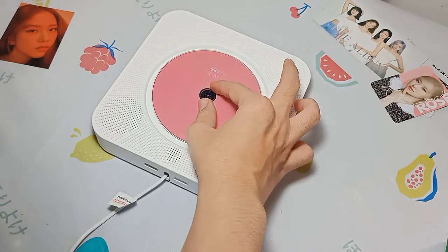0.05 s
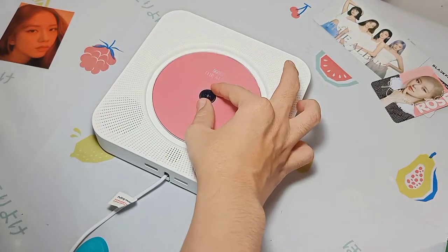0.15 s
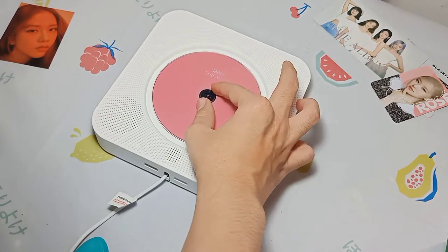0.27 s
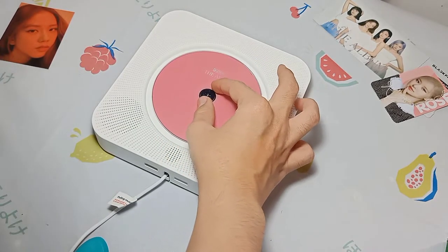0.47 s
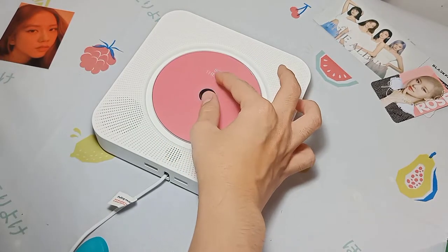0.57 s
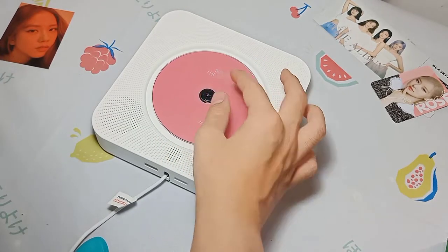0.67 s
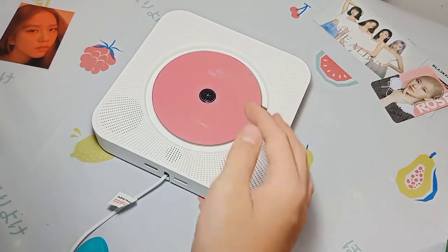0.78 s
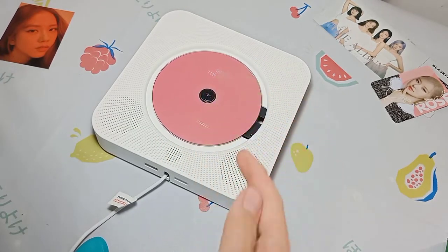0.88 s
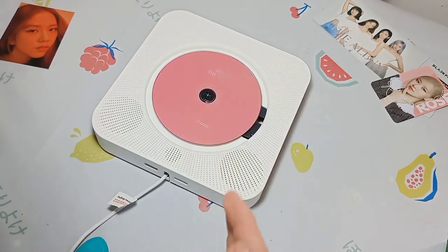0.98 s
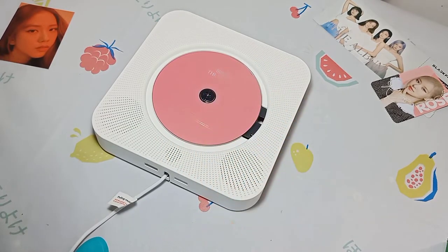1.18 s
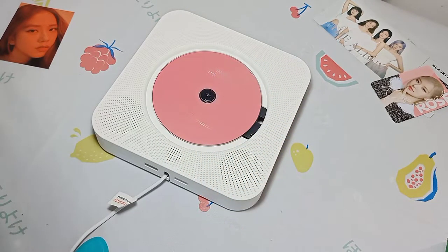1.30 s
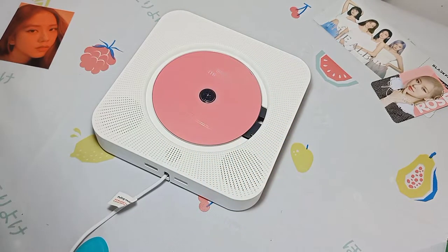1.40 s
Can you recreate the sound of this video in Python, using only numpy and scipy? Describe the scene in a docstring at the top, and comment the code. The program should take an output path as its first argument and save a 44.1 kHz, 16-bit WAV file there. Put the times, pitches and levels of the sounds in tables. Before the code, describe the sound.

Fingers tap faintly on plastic, then a disc snaps onto a player's hub with one bright, close click and a soft knock through the case. Barely audible hand brushes follow over quiet indoor noise and fan hum.

```python
"""A disc pressed onto a player's hub

The catches of a small plastic player slip and snap through the disc's hole, exciting bright modes.
The disc seats and rings briefly, the case and table thump, and a small room reverberates.
Fingers touch the plastic faintly before and after, over quiet room noise with a fan's hum."""
import sys
import numpy as np
from scipy import signal
from scipy.fft import rfft, irfft
from scipy.io import wavfile

SR = 44100
rng = np.random.default_rng(int(sys.argv[2]) if len(sys.argv) > 2 else 0)


def file_out(sig):
    """Save sig as 16-bit WAV at sys.argv[1]."""
    # one column per channel
    cols = np.atleast_2d(sig).T
    # limit, then scale
    lim = np.clip(cols, -1, 1)
    pcm = np.round(lim * 32767).astype(np.int16)
    wavfile.write(sys.argv[1], SR, pcm)


N = 63945
TIME_S = np.arange(N) / SR
BIN_HZ = np.arange(N // 2 + 1) * SR / N
ANTIPHASE = np.array([[1], [-1]])  # left, right


def undb(db):
    """Decibels to amplitude ratio."""
    return 10 ** (np.asarray(db) / 20)


def over_hz(points, hz):
    """Interpolation of (frequency_hz, value) points on a log-frequency axis."""
    knots_hz, values = np.array(points, float).T
    return np.interp(np.log(np.maximum(hz, 1)), np.log(knots_hz), values)


def fade(start_s, t60_s):
    """Exponential decay: a sudden onset, then a fall of 60 dB in t60_s."""
    age = np.maximum(TIME_S - start_s, 0)
    return (age > 0) * np.exp(-np.log(1000) * age / max(t60_s, 1e-4))


def pan(left_minus_right_db):
    """Amplitude panning: left and right gains for a level difference."""
    return undb(ANTIPHASE * left_minus_right_db / 2)


def noise(colour):
    """Spectral shaping: white noise filtered to a colour, at unit RMS."""
    shaped = irfft(rfft(rng.standard_normal(N)) * undb(over_hz(colour, BIN_HZ)), N)
    return shaped / shaped.std()


def ring(modes, start_s, rise_cycles=.6):
    """Modal superposition: damped sinusoids, each with its own build-up and direction."""
    age = np.maximum(TIME_S - start_s, 0)
    out = 0
    for hz, db, t60, side_db in modes:
        envelope = fade(start_s, t60) * (1 - np.exp(-age * hz / rise_cycles))
        out = out + undb(db) * pan(side_db) * envelope * np.sin(2 * np.pi * hz * age)
    return out


def diffuse_spectra():
    """Diffuse field: white noise from all around, coherent between the sides only in the bass."""
    # likeness of left and right: frequency_hz, correlation
    coherence = [(100, 1), (500, 0.42), (1200, .45), (3000, .1), (10000, 0.057)]
    alike = np.clip(over_hz(coherence, BIN_HZ), 0, 1)
    mid, side = rfft(rng.standard_normal((2, N)))
    return mid * np.sqrt((1 + alike) / 2) + side * np.sqrt((1 - alike) / 2) * ANTIPHASE


def room_noise():
    """Stationary noise: a quiet diffuse field, strongest in the bass."""
    # background spectrum: frequency_hz, relative_db
    colour = [(20, -29), (33, -22.5), (50, -7.5), (70, -11), (105, -5), (135, -8.5), (185, -6), (267, -11),
              (380, -5), (460, -10.5), (540, -11.5), (820, -12.5), (950, -20.5), (1400, -23.5), (2000, -20),
              (2900, -21), (3400, -29.5), (5200, -35.5), (7300, -33.5), (10000, -39.5), (15500, -42.5)]
    hiss = irfft(diffuse_spectra() * undb(over_hz(colour, BIN_HZ)), N)
    return undb(-58) * hiss / hiss.std()


def fan(waver_db=1.5):
    """Random modulation: slow drifts of pitch and level broaden each tone of the hum."""
    # fan tones: pitch_hz, level_db, width_hz
    tones = [(49.6, -75.5, 3.99), (102.5, -74, 6), (394.8, -63, 4.6), (492, -71.5, 5), (792, -73.5, 4)]
    drift = [(1, 0), (8, 0), (30, -40), (100, -120)]  # frequency_hz, relative_db
    out = 0
    for hz, db, width in tones:
        phase = 2 * np.pi * np.cumsum(hz + width / 2 * noise(drift)) / SR
        out = out + undb(db + waver_db * noise(drift)) * np.sqrt(2) * np.sin(phase)
    return out


def finger_touches(disc_hz=625):
    """Impulse response: each light touch ticks and sets the plastic and the disc ringing."""
    # fingers meeting and leaving the plastic: start_s, level_db, pitch_hz, t60_s, disc_relative_db
    touches = [(0.0665, -54.5, 2110, 0.028, 3), (0.0906, -50, 1587, 0.038, 4),
               (0.5272, -61.5, 1640, 0.026, -8), (.5745, -57, 1535, 0.059, 14),
               (1.0465, -55, 2700, .05, -14)]
    # contact noise spectrum: frequency_hz, relative_db
    colour = [(300, 2), (1700, 11.5), (3500, -7), (8000, -8), (15000, -16.5)]
    out = 0
    for start, db, hz, t60, disc_db in touches:
        tone = ring([(hz, 0, t60, 0), (disc_hz, disc_db, t60, 0)], start)
        tick = undb(-1) * noise(colour) * fade(start, t60 / 2)
        out = out + undb(db) * (tone + tick)
    return out


def catch_slip(peak_s=.2288, half_length_s=.0006):
    """Sliding friction: the catches scrape through the hole in one very short burst."""
    # scrape spectrum: frequency_hz, relative_db
    colour = [(500, -28), (2000, -12.5), (5500, -22), (7000, -4), (8200, -0.5), (9200, -6), (11000, -21),
              (15000, -28)]
    return undb(-14.5) * noise(colour) * np.exp(-((TIME_S - peak_s) / half_length_s) ** 2)


def catch_snaps(crack_db=-6, crack_t60_s=.0081, side_ratio=.75, right_lag_s=.00003):
    """Impact excitation: each catch snaps home with a broadband crack and rings the hub's modes."""
    # catches striking the rim of the hole: start_s, level_db
    snaps = [(0.2287, -13.5), (0.2305, -1), (0.2319, -8)]
    # crack spectrum: frequency_hz, relative_db
    colour = [(300, -11), (1000, 0), (2200, -3.5), (3300, -12), (4500, -15.5), (6000, -10.5), (8300, -0.5),
              (11000, -11), (15500, -16)]
    # modes of the hub and catches: pitch_hz, level_db, t60_s, left_minus_right_db
    modes = [(4200, -27.5, .01, -8.5), (6040, -21, .008, -10), (6750, -19, .014, -9.5),
             (7304, -15, .012, -7.5), (7750, -15, .007, -0.5), (8165, -9.5, .011, 7.5),
             (9050, -14, .007, 10), (9906, -26, .008, 9)]
    cracks = 0
    for start, db in snaps:
        crack = (noise(colour) + side_ratio * noise(colour) * ANTIPHASE) / np.hypot(1, side_ratio)
        cracks = cracks + undb(db + crack_db) * crack * fade(start, crack_t60_s)
    left, right = sum(undb(db) * ring(modes, start) for start, db in snaps)
    right = irfft(rfft(right) * np.exp(-2j * np.pi * BIN_HZ * right_lag_s), N)
    return cracks + np.array([left, right])


def disc_seating(start_s=.2303):
    """Plate vibration: the disc lands with a hollow knock; its weaker modes overlap into a wash."""
    # modes of the disc and tray: pitch_hz, level_db, t60_s, left_minus_right_db
    modes = [(458.2, -20.5, 0.13, 6), (526.2, -23, 0.24, -6.5), (580.7, 5, .028, -0.5),
             (602.8, -21.5, 0.15, 0), (1104, -25.5, 0.055, -1.5), (1394, -23, .02, 5),
             (1620, -21.5, .03, -7.5), (1757, -13, 0.022, 7.5), (2136, -26, 0.016, -12.5)]
    # spectrum of the many weak modes: frequency_hz, relative_db
    colour = [(300, -20), (750, -7.5), (980, 2.5), (1300, -3), (1800, 0), (2400, -5), (3200, -15.5),
              (6000, -24.5), (15000, -36)]
    wash = np.array([noise(colour), noise(colour)]) * fade(start_s, t60_s=.25)
    return ring(modes, start_s, rise_cycles=1.6) + undb(-31.5) * wash


def case_thump():
    """Structure-borne sound: the blow reaches the case and table, whose low modes boom."""
    # the blow, then one rock back: start_s, level_db
    thumps = [(.238, 0.5), (.301, -11)]
    # modes of the case and table top: pitch_hz, level_db, t60_s, left_minus_right_db
    modes = [(89, -38.5, 0.13, 0.5), (116.5, -29.5, .3, 0.5), (131.7, -28.5, 0.28, 1),
             (149, -24.5, .13, -1), (196.6, -28.5, 0.14, 2), (232, -30.5, 0.14, 2), (318, -36.5, .1, 3)]
    return sum(undb(db) * ring(modes, start) for start, db in thumps)


def hand_brushes():
    """Friction noise: the withdrawing hand brushes the plastic in soft Gaussian swells."""
    # strokes of the hand: peak_s, level_db, half_length_s
    strokes = [(1.24, -61.5, .005), (1.29, -74, .12), (1.434, -60.5, .01)]
    # rubbing spectrum: frequency_hz, relative_db
    colour = [(1000, -22), (2500, 1), (4200, 0), (5500, -7), (8000, 1), (11000, -8), (15000, -14)]
    out = 0
    for peak, db, half_length in strokes:
        swell = np.exp(-((TIME_S - peak) / half_length) ** 2)
        out = out + undb(db) * swell * np.array([noise(colour), noise(colour)])
    return out


def unit_energy(envelope):
    """Normalisation: the squared samples sum to one."""
    return envelope / np.sqrt(np.sum(envelope ** 2))


def reverberation(direct, treble_pan_db=-2, full_pan_hz=7100):
    """Convolution with a room response: early reflections, then a tail decaying band by band."""
    # reflections from the table and things on it: frequency_hz, relative_db
    colour = [(500, -1), (1500, 2.5), (4000, 3), (8500, -10), (14000, -3)]
    # reverberant tail: frequency_hz, level_db, t60_s
    bands = [(119.8, -14.5, .48), (300, -9.5, 0.42), (560, -9, 0.41), (850, -6.5, .32), (1200, -9.5, 0.2),
             (2000, -9.5, .37), (4000, -4.5, 0.28), (6000, -9, .3), (7100, -7, .36), (8500, -19, .29),
             (12000, -8, .27)]
    early = irfft(diffuse_spectra() * undb(over_hz(colour, BIN_HZ)), N)
    response = undb(-8) * early * unit_energy(fade(start_s=.004, t60_s=.06))
    field = diffuse_spectra()
    for hz, db, t60 in bands:
        band_share = over_hz([(centre, centre == hz) for centre, _, _ in bands], BIN_HZ)
        tail = irfft(field * band_share, N) * unit_energy(fade(start_s=.008, t60_s=t60))
        response = response + undb(db) * pan(treble_pan_db * min(hz / full_pan_hz, 1)) * tail
    mono = direct.mean(axis=0, keepdims=True)
    return signal.fftconvolve(mono, response, axes=1)[:, :N]


def scene():
    """Superposition: the close sounds and their reverberation, the thump and the background."""
    direct = catch_slip() + catch_snaps() + disc_seating() + finger_touches() + hand_brushes()
    return direct + case_thump() + reverberation(direct) + room_noise() + fan()


def record(dry, low_cut_hz=35.02, top_hz=15700):
    """Band limiting and saturation: rumble is cut, peaks clip at full scale, then the top is cut."""
    high_pass = signal.butter(2, low_cut_hz, "high", fs=SR, output="sos")
    low_pass = signal.ellip(8, .2, 70, top_hz, fs=SR, output="sos")
    clipped = np.clip(signal.sosfilt(high_pass, dry), -1, 1)
    return signal.sosfilt(low_pass, clipped)


dry = scene()
out = record(dry)
file_out(out)
```